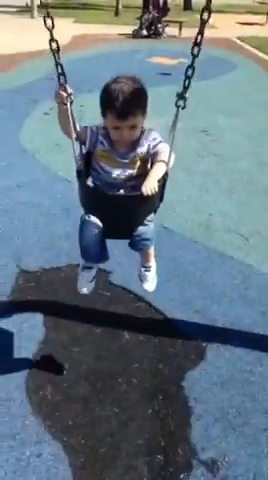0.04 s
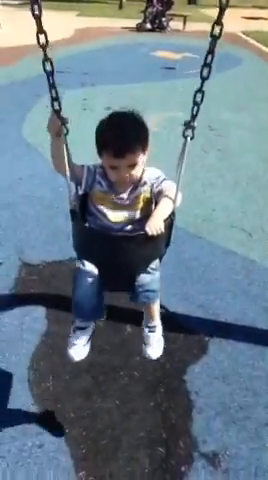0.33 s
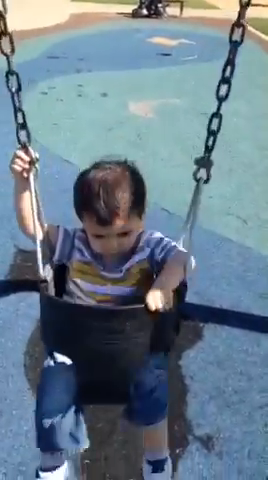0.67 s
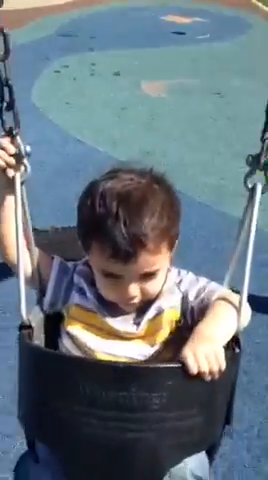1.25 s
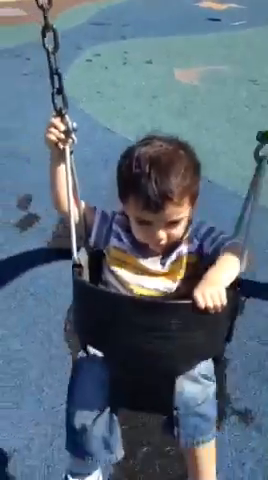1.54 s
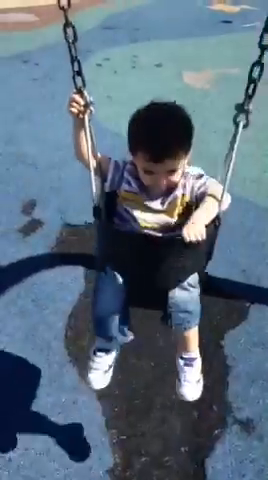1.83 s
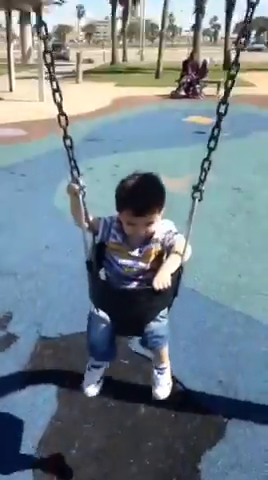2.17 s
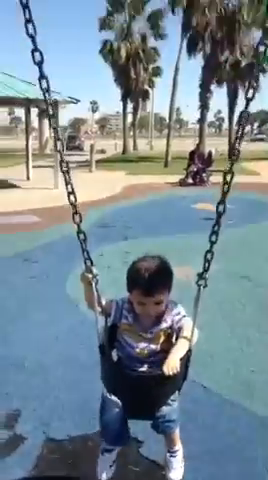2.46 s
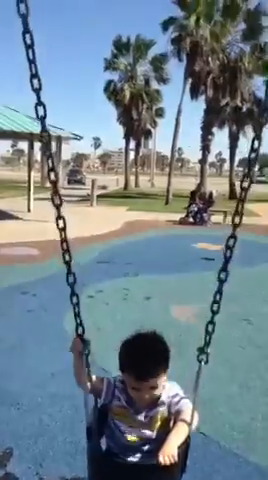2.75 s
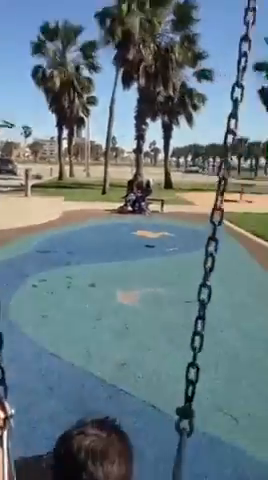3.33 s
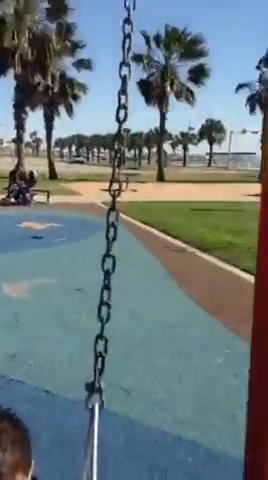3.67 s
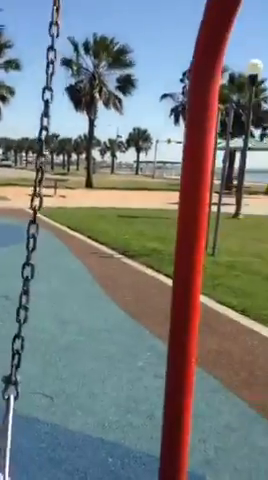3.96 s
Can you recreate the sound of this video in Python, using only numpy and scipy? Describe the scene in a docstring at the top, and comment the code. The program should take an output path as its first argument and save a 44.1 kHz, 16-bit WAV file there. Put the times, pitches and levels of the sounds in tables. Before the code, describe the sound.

Playground swing chains squeaking in low and high squeals, with wind buffeting the microphone.

```python
"""Playground swing in the wind

A child's swing goes to and fro close to the microphone, in an open playground. On each pass its two
steel hangers stick and slip, one squealing low, one high; twice they groan as they slow. The frame
sings faintly. Wind buffets the microphone, with a soft rustle and one chain tick over a distant hush."""
import sys
import numpy as np
from scipy import signal
from scipy.io import wavfile

SR = 44100
rng = np.random.default_rng(int(sys.argv[2]) if len(sys.argv) > 2 else 0)


def store_pcm(level_fs):
    """Save levels as 16-bit WAV."""
    pcm = np.round(np.clip(level_fs, -1, 1) * 32767).astype(np.int16)
    wavfile.write(sys.argv[1], SR, np.atleast_2d(pcm).T)


N = 176400
T = np.arange(N) / SR
FLUTTER_HZ, JITTER_HZ = 22.7, 227   # slow and fast unevenness of the grip of steel on steel
SQUEAL_FADE_S = .012
SCRAPE_BAND_HZ = (900, 5650)   # rustle, tick and the rasp under a groan


def from_db(db):
    """Decibels to amplitude."""
    return 10 ** (np.asarray(db) / 20)


def rms_one(x):
    """The signal scaled to rms 1."""
    return x / np.sqrt(np.mean(x ** 2) + 1e-20)


def band_noise(low_hz, high_hz, order=2):
    """Band-passed noise at rms 1."""
    sos = signal.butter(order, [low_hz, min(high_hz, SR / 2 - 1)], "band", fs=SR, output="sos")
    return rms_one(signal.sosfilt(sos, rng.standard_normal(N)))


def drift(rate_hz):
    """Smooth random wander at rms 1."""
    pole = np.exp(-2 * np.pi * rate_hz / SR)
    return rms_one(signal.lfilter([1], [1, -2 * pole, pole * pole], rng.standard_normal(N + SR))[SR:])


def gate(start_s, end_s, fade_s):
    """Opens and closes with soft edges."""
    return np.sin(np.pi / 2 * np.clip(np.minimum(T - start_s, end_s - T) / fade_s, 0, 1)) ** 2


def noise_bands(spectrum):
    """Roughly half-octave noise bands that add up to about rms 1, as (centre_hz, noise) pairs."""
    hz, db = np.transpose(spectrum)
    edges = np.geomspace(hz[0], hz[-1], int(2 * np.log2(hz[-1] / hz[0])) + 2)
    centres = np.sqrt(edges[1:] * edges[:-1])
    gains = from_db(np.interp(np.log(centres), np.log(hz), db)) * np.sqrt(np.diff(edges))
    gains = gains / np.linalg.norm(gains)
    return [(centre, gain * band_noise(low, high))
            for centre, gain, low, high in zip(centres, gains, edges, edges[1:])]


def distant_hush():
    """Steady, soft noise from far off."""
    # spectrum of the hush: frequency_hz, relative_density_db
    spectrum = [(200, -3.5), (1500, -5), (5000, -22.5), (15000, -31)]
    return from_db(-50) * sum(noise for _, noise in noise_bands(spectrum))


def playground_echo(near):
    """The close sound plus weak scattered echoes from the open ground."""
    echo_db, t60_s = -19, .56
    tail = rng.standard_normal(SR) * from_db(-60 * T[:SR] / t60_s)
    return near + from_db(echo_db) * signal.fftconvolve(near, tail / np.linalg.norm(tail))[:N]


def wind():
    """Lumpy rumble on the microphone: stronger eddies are louder and brighter."""
    # course of the gusts: time_s, strength_db
    gusts = [(.08, -30), (.2, -47), (.29, -27.5), (.62, -23.5), (.72, -36.5), (0.929, -40), (.99, -20),
             (1.18, -23.5), (1.3, -29), (1.54, -45), (1.599, -32), (1.95, -46), (2.2, -26.5), (2.56, -26.5),
             (2.799, -18.5), (2.901, -29.5), (3.18, -31.5), (3.32, -18.5), (3.42, -24.5), (3.63, -35),
             (3.66, -23.5), (4.0, -25.5)]
    # spectrum of the rumble at typical strength: frequency_hz, relative_density_db
    spectrum = [(25, -34.5), (60, -2.5), (150, 1), (300, -2.5), (600, -18.5), (1400, -54.5)]
    typical_db, trim_db, eddy_limit_db = -17, -1, 9
    brightening, pivot_hz = .38, 171   # the surge grows by this share per octave above the pivot
    eddies_db = eddy_limit_db * np.tanh(drift(rate_hz=36.6) / 2)
    surge_db = np.interp(T, *np.transpose(gusts)) - typical_db + eddies_db
    rumble = sum(noise * from_db(surge_db * (1 + brightening * np.log2(hz / pivot_hz)))
                 for hz, noise in noise_bands(spectrum))
    return from_db(typical_db + trim_db) * rumble


def buffets():
    """Eddies hit the microphone port: each a push and pull of pressure, with a swirl behind it."""
    # single hard buffets: time_s, push_peak_db, centre_hz
    hits = [(0.068, -19, 335), (0.282, -9.5, 156), (.319, -20, 325), (0.413, -16.5, 222), (.476, -14, 312),
            (.582, -13.5, 383), (0.979, -11.5, 127), (1.024, -9.5, 383), (1.128, -6, 323),
            (1.159, -8.5, 546), (1.223, -12.5, 370), (2.319, -10.5, 490), (2.359, -18.5, 416),
            (2.459, -16.5, 378), (2.511, -8, 285), (2.611, -13, 149), (2.664, -11.5, 404), (2.747, -4, 356),
            (2.814, -12.5, 170), (2.845, -8, 172), (3.075, -8.5, 112), (3.253, -9.5, 454.6),
            (3.321, -9, 260), (3.658, -13.5, 192), (3.847, -15, 372)]
    half_length_cycles, swirl_share = .84, .33
    out = 0
    for time_s, peak_db, hz in hits:
        cycles = (T - time_s) * hz
        age = cycles / half_length_cycles
        push = np.sin(2 * np.pi * cycles) / np.cosh(np.clip(2 * age, -40, 40))
        wake = np.maximum(age + .5, 0)
        swirl = band_noise(hz / 2, hz * 1.71, order=3) * wake * np.exp(1 - wake)
        out = out + from_db(peak_db) * (push / push.max() + swirl_share * swirl)
    return out


def rustle_and_tick():
    """A soft rustle, strongest in the first second, and one dry tick of a chain link."""
    # course of the rustle: time_s, level_db
    rustle_levels = [(.22, -51.5), (.31, -47), (.38, -52.5), (1.0, -59)]
    tick_s, tick_db, decay_s = 1.528, -42, .011
    rustle = from_db(np.interp(T, *np.transpose(rustle_levels)))
    tick = from_db(tick_db) * (T > tick_s) * np.exp(-abs(T - tick_s) / decay_s)
    return (rustle + tick) * band_noise(*SCRAPE_BAND_HZ)


def slip_phase(pitch_hz, wander=.001564, jitter=.0018):
    """Phase of a stick-slip cycle that wanders and jitters by small shares of its pitch."""
    unsteady_hz = pitch_hz * (1 + wander * drift(FLUTTER_HZ) + jitter * drift(JITTER_HZ))
    return 2 * np.pi * np.cumsum(unsteady_hz) / SR


def frame():
    """The steel frame sings one faint note, three times."""
    # notes of the frame: start_s, length_s, level_db
    notes = [(-.03, 0.13, -44), (1.5, 0.44, -49.5), (3.386, 0.316, -47)]
    level = sum(from_db(db) * gate(start, start + length, fade_s=.0099) for start, length, db in notes)
    return np.sqrt(2) * level * np.sin(slip_phase(pitch_hz=1442))


def groans():
    """The slowing hanger drops into a lower, rougher slip, with unsteady overtones and a dry rasp."""
    # groans at the end of a pass: start_s, length_s, start_pitch_hz, fundamental_db, overtones_db
    slow_slips = [(0.73, 0.14, 919, -39, -38), (3.258, 0.18, 919, -22, -42.5)]
    # harmonics 2 to 5: offset_db from overtones_db
    harmonics = [-8.5, 0, -11, -16.5]
    rise_hz_per_s, decay_db_per_s, flicker_db, rasp_db = 120, 108, 7, -45.5
    out = 0
    for start, length, hz, fundamental_db, overtones_db in slow_slips:
        phase = slip_phase(hz + rise_hz_per_s * (T - start), jitter=.01055)
        fundamental = from_db(fundamental_db) * np.sin(phase)
        overtones = 0
        for number, offset_db in enumerate(harmonics, 2):
            flicker = flicker_db * np.tanh(drift(2 * FLUTTER_HZ))
            overtones = overtones + from_db(overtones_db + offset_db + flicker) * np.sin(number * phase)
        rasp = from_db(rasp_db) * band_noise(*SCRAPE_BAND_HZ)
        decay = from_db(-decay_db_per_s * np.maximum(T - start, 0))
        swell = gate(start, start + length, fade_s=.055)
        out = out + swell * (decay * (fundamental + rasp) + overtones)
    return out


def stick_slip(bursts, harmonics_db):
    """One mode sticks and slips in bursts: the sound, and its fundamental as a rotating vector."""
    level, pitch_sum, brightness_sum = 1e-12, 0, 0   # overlapping bursts blend by their levels
    for start, length, hz, db, overtones_db in bursts:
        burst = from_db(db) * gate(start - SQUEAL_FADE_S, start + length + SQUEAL_FADE_S,
                                   fade_s=2 * SQUEAL_FADE_S)
        level = level + burst
        pitch_sum = pitch_sum + burst * hz
        brightness_sum = brightness_sum + burst * from_db(overtones_db)
    grip = from_db(1.19 * band_noise(FLUTTER_HZ / 2, FLUTTER_HZ * 2))   # uneven grip: a slight flutter
    phase = slip_phase(pitch_sum / level)
    brightness = grip * brightness_sum / level
    amplitude = np.sqrt(2) * level * grip
    overtones = sum(from_db(db) * np.sin(number * phase) for number, db in enumerate(harmonics_db, 2))
    return amplitude * (np.sin(phase) + brightness * overtones), amplitude * np.exp(1j * phase)


def low_hanger():
    """Squeals that glide in pitch and level; on the middle pass the hanger shudders and chatters."""
    # low squeals: start_s, length_s, first_hz, last_hz, first_db, last_db
    squeals = [ (.32, .12, 1787, 1815, -33.5, -42.5), (0.443, 0.073, 1856, 1775, -47, -33.5),
               (0.513, 0.052, 1538, 1566, -48, -28.5), (0.573, 0.1, 1564, 1572, -27.5, -26.5),
               (.685, 0.086, 1560, 1530, -39, -33), (0.817, 0.18, 1544, 1535, -29.5, -43.5),
               (1.597, 0.4, 1973, 1979, -28, -31.5), (2.029, 0.1395, 1975, 1932, -33.5, -25.5),
               (2.176, 0.33, 1947, 1933, -32, -57), (2.909, 0.098, 1580, 1582, -29, -35.5),
               (3.041, 0.17, 1577, 1576, -32.5, -22.5), (3.216, 0.11, 1583, 1529, -28.5, -60)]
    # harmonics 2 to 5: relative_level_db
    harmonics = [-21.5, -30, -37.5, -43.5]
    shudder_start_s, shudder_end_s, shudder_hz, shudder_db, chatter_db = 1.603, 2.0, 13.9, 4, 1.1
    chatter = chatter_db * band_noise(FLUTTER_HZ, JITTER_HZ / 2)
    shudder = shudder_db * np.cos(2 * np.pi * shudder_hz * (T - shudder_start_s))
    shake_db = gate(shudder_start_s, shudder_end_s, SQUEAL_FADE_S) * (shudder + chatter)
    bursts = []
    for start, length, first_hz, last_hz, first_db, last_db in squeals:
        pitch_hz = np.interp(T, [start, start + length], [first_hz, last_hz])
        level_db = np.interp(T, [start, start + length], [first_db, last_db]) + shake_db
        bursts.append((start, length, pitch_hz, level_db, 0))
    return stick_slip(bursts, harmonics)


def high_hanger():
    """Stuttering squeals that jump between two modes, and one brief chirp of a third."""
    # high squeals: start_s, length_s, pitch_hz, level_db, relative_overtones_db
    squeals = [ (0.344, .13, 3460, -33, -35), (0.473, .11, 3167, -25, -20),
               (0.583, 0.17, 3179, -28.5, -17.5), (0.838, 0.081, 3522, -29, -23.5),
               (.948, .045, 3497, -25.5, -33), (1.727, 0.079, 3462, -24.5, -26.5),
               (1.823, 0.09, 3206, -21.5, -15.5), (1.928, 0.048, 3200, -23, -16),
               (1.982, 0.045, 3170, -25, -17), (2.037, 0.052, 3150, -26, -22),
               (2.12, 0.024, 3114, -23.5, -19), (2.163, 0.023, 3085, -29.5, -21.5),
               (2.208, 0.073, 3106, -30.5, -21), (2.327, 0.025, 3128, -31, -29),
               (2.909, 0.038, 3156, -29.5, -26.5), (2.981, 0.12, 3156, -30.5, -10),
               (3.098, .1, 3168, -30, -19), (3.225, 0.058, 3172, -27, -22.5),
               (3.425, 0.11, 3504, -36.5, -23), (3.59, 0.021, 3485, -37.5, -26)]
    # harmonics 2 to 4: offset_db from relative_overtones_db
    harmonics = [-0.5, -21, -31.5]
    mode_split_hz = 3350
    lower, lower_vector = stick_slip([row for row in squeals if row[2] < mode_split_hz], harmonics)
    upper, upper_vector = stick_slip([row for row in squeals if row[2] >= mode_split_hz], harmonics)
    chirp = from_db(-46) * gate(3.415, 3.47, SQUEAL_FADE_S) * np.sin(slip_phase(pitch_hz=4447))
    return lower + upper + chirp, lower_vector + upper_vector


def hangers():
    """Both hangers squeal close to the microphone; sounding together they couple and make sum tones."""
    # sum tones at low + high, low + 2 high, 2 low + high: relative_level_db
    coupling = [-21.5, -33.5, -28]
    low_squeal, low = low_hanger()
    high_squeal, high = high_hanger()
    joint_level = np.hypot(abs(low), abs(high)) + 1e-9
    # multiplying the rotating vectors adds their pitches
    products = [low * high / joint_level,
                low * high ** 2 / joint_level ** 2,
                low ** 2 * high / joint_level ** 2]
    sum_tones = sum(from_db(db) * tone.imag for db, tone in zip(coupling, products))
    return low_squeal + high_squeal + sum_tones


def scene():
    """One microphone: the swing close by, the hush far off, the wind on the port."""
    swing = playground_echo(hangers() + groans() + frame() + rustle_and_tick())
    return (swing + distant_hush() + wind() + buffets())[None]


def record(dry):
    """The sound starts and ends softly, and the highest treble is cut."""
    cutoff_hz = 15250
    low_pass = signal.ellip(10, .1, 80, cutoff_hz, fs=SR, output="sos")
    return signal.sosfilt(low_pass, dry * gate(0, T[-1], fade_s=.004))


dry = scene()
out = record(dry)
store_pcm(out)
```